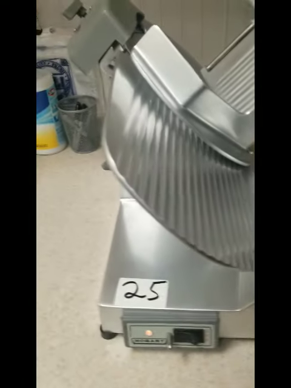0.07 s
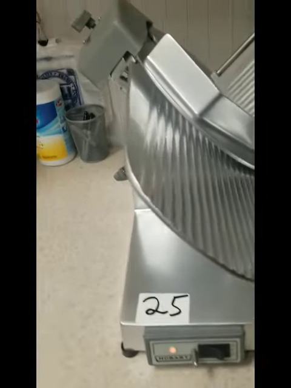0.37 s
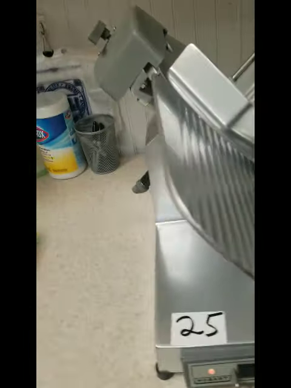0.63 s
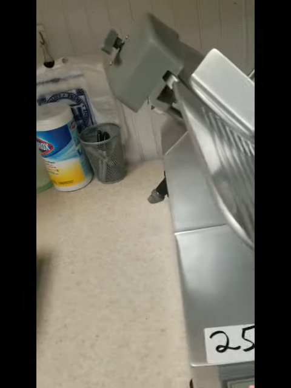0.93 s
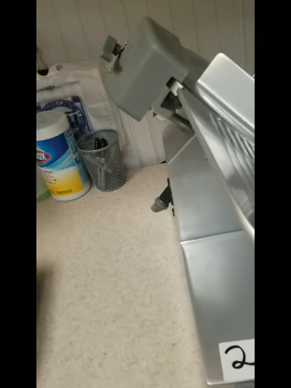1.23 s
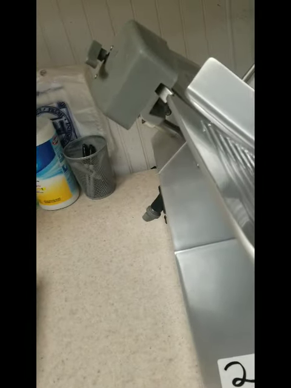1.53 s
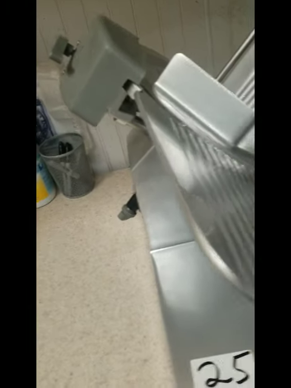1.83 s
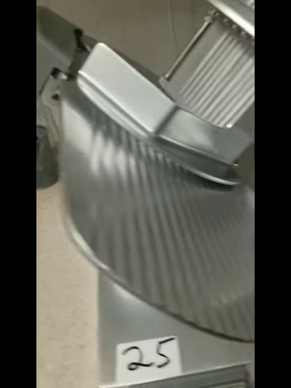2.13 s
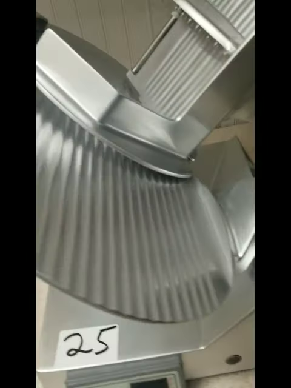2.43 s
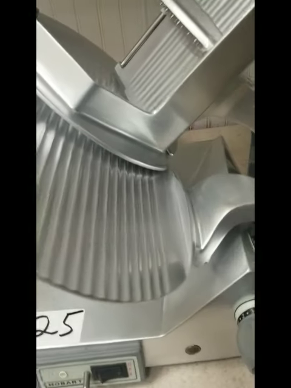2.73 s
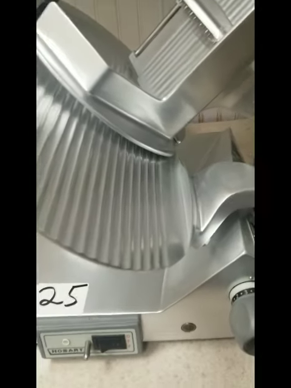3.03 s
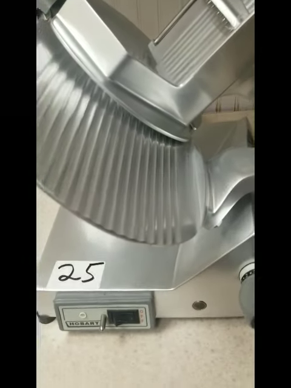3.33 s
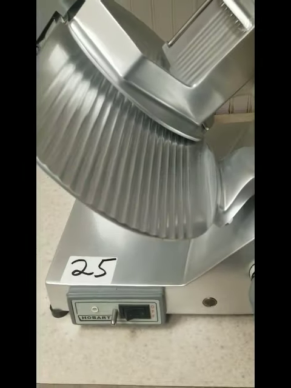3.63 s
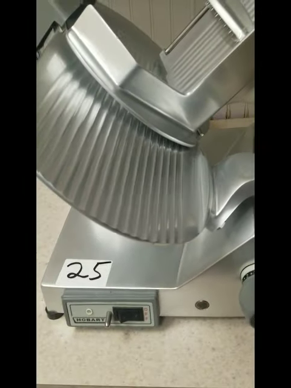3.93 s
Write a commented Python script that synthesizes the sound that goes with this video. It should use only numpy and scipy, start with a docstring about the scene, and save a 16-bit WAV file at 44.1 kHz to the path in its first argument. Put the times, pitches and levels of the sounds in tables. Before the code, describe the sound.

An electric deli slicer hums and chatters, then clicks off and its blade coasts.

```python
"""An electric deli slicer runs on a counter: on every turn of the blade the rim brushes its guard
and the drive teeth chatter against the housing, over the hum of the motor. The switch snaps off,
hum and chatter stop, and the blade coasts on, brushing ever more slowly, with a faint bearing
whistle and a few knocks from the slack drive. A refrigerator drones in the small room."""
import sys
import numpy as np
from scipy import signal
from scipy.fft import rfft, irfft
from scipy.io import wavfile

SR = 44100
rng = np.random.default_rng(int(sys.argv[2]) if len(sys.argv) > 2 else 0)


def bounce(signal):
    """Save signal as a 16-bit WAV file at the path given by the first command-line argument."""
    frames = np.transpose(np.atleast_2d(signal))
    limited = np.clip(frames, -1, 1)
    pcm = np.round(limited * 32767).astype(np.int16)
    wavfile.write(sys.argv[1], SR, pcm)


N = 176400
T, HZ = np.arange(N) / SR, np.fft.rfftfreq(N, 1 / SR)
HUM_HZ, OFF_S = 119.95, 2.0904  # pitch of the motor; the moment the power is cut
SINCE_OFF = np.maximum(T - OFF_S, 0)


def amp(db):
    """Decibels to gain."""
    return 10 ** (np.asarray(db) / 20)


def unit(x):
    """Scales to rms 1."""
    return x / np.sqrt(np.mean(abs(x) ** 2) + 1e-20)


def curve(points, at):
    """Joins breakpoints by straight lines."""
    return np.interp(at, *np.transpose(points))


def read(points, hz):
    """Reads breakpoints on a log-frequency axis."""
    freqs, values = np.transpose(points)
    return np.interp(np.log(hz + 1), np.log(freqs + 1), values)


def colour(x, points):
    """Shapes a sound with an EQ curve, at rms 1."""
    return unit(irfft(rfft(x) * amp(read(points, HZ)), N))


def resonate(x, modes):
    """Passes a sound through a bank of resonances, at rms 1."""
    power = sum(amp(db) ** 2 / (1 + (2 * (HZ - hz) / width) ** 2) ** 2 for hz, db, width in modes)
    return unit(irfft(rfft(x) * np.sqrt(power), N))


def noise():
    """White noise, unrelated in the two channels."""
    return rng.standard_normal((2, N))


def drift(rate_hz):
    """A complex random wander of rms 1, moving at up to about rate_hz."""
    white = rng.standard_normal(N) + 1j * rng.standard_normal(N)
    return unit(np.fft.ifft(white / (1 + (np.fft.fftfreq(N, 1 / SR) / rate_hz) ** 4)))


def tone(hz, db, waver, rate_hz):
    """A sine that wavers at random in level and phase."""
    phasor = np.exp(2j * np.pi * rng.random()) + waver * drift(rate_hz)
    return amp(db) * unit((phasor * np.exp(2j * np.pi * hz * T)).real)


def decay(start, t60):
    """Envelope of a hit: instant attack, then 60 dB down in t60 seconds."""
    return (T >= start) * np.exp(-np.log(1000) * np.maximum(T - start, 0) / t60)


def powered(hold_s, fall_db_per_s):
    """Envelope that stays full until hold_s after the power is cut, then dies away."""
    return amp(-fall_db_per_s * np.maximum(SINCE_OFF - hold_s, 0))


# Stereo width. Each row: frequency in Hz, left-right likeness from 0 (wide) to 1 (mono).
LIKENESS = [(100, 0.73), (250, 0.87), (500, 0.34), (900, 0.65), (1400, 0.059), (2500, 0), (6000, 0.0017),
            (15000, 0.043)]
# Pan of the slicer's motor, drive and bearings. Each row: frequency in Hz, left minus right in dB.
MACHINE_PAN = [(100, 1.4), (350, 2.7), (700, 0), (1300, -6.5), (2000, -7.5), (3500, -2), (6500, -5),
               (10000, 5), (15000, -3.5)]
def place(x, pan=MACHINE_PAN):
    """Pans a sound by frequency; a stereo sound is first narrowed in the lows."""
    left, right = rfft(x * np.ones((2, 1)))
    if x.ndim == 2:
        alike = np.clip(read(LIKENESS, HZ), 0, 1)
        right = alike * left + np.sqrt(1 - alike ** 2) * right
    lean = amp(read(pan, HZ) / 2)
    return irfft(np.array([left * lean, right / lean]), N)


# Refrigerator drone. Each row: pitch in Hz, level in dB, waver depth.
FRIDGE_TONES = [(59, -50.5, 0.95), (118.8, -40, 0.4), (181.8, -59.5, 0.99), (241.2, -48, 0.85),
                (489, -60.5, 0.35), (576, -82.5, 0.43), (697, -70.5, 0.47), (855, -63.5, 0.97)]
# Dark room tone. Each row: frequency in Hz, relative level in dB.
AIR_EQ = [(15, -47), (25, -11), (119, -5), (169, -9), (240, -4.5), (290, -11), (584, -17.5), (686, -13),
          (744, -31.5), (851, -27), (1240, -27.5), (6410, -43), (7960, -48), (11900, -41), (15600, -42)]
# Pan of the background. Each row: frequency in Hz, left minus right in dB.
ROOM_PAN = [(100, 1), (500, 0.057), (1500, 1), (15000, -1)]
def kitchen(air_db=-44):
    """The bed: a refrigerator drones over still room air."""
    drone = sum(tone(hz, db, waver, rate_hz=2.67) for hz, db, waver in FRIDGE_TONES)
    air = amp(air_db) * colour(noise(), AIR_EQ)
    return place(drone, ROOM_PAN) + place(air, ROOM_PAN)


# Tight reverb of the small room. Each row: frequency in Hz, seconds to fall 60 dB.
ROOM_DECAY = [(200, 0.34), (1500, 0.16), (5000, .17), (15000, 0.15)]
def room(x, wet_db):
    """Adds a short tail of sparse reflections from the counter and walls."""
    taps = rng.choice([-1., 1.], (2, SR // 2)) * (rng.random((2, SR // 2)) < .1)
    hz, t, bands = signal.stft(taps, SR, nperseg=256)
    tail = signal.istft(bands * amp(-60 * t / read(ROOM_DECAY, hz)[:, None]), SR)[1]
    wet = signal.fftconvolve(x * np.ones((2, 1)), tail / np.linalg.norm(tail[0]), axes=1)[:, :N]
    return x + amp(wet_db) * wet


def bearing_whistle(start_hz=3720, sag_hz_per_s2=190, width_hz=150, db=-58.5, fade_from_s=2.44):
    """A bearing sings as the blade slows: a thin, fuzzy whistle that sags and dies out."""
    pitch = start_hz - sag_hz_per_s2 * SINCE_OFF ** 2
    carrier = np.exp(2j * np.pi * np.cumsum(pitch) / SR)
    whistle = unit(np.array([(drift(width_hz) * carrier).real for channel in range(2)]))
    fade_in = np.minimum(SINCE_OFF / 0.032, 1)
    level = amp(db - 17 * np.maximum(T - fade_from_s, 0))
    return place(whistle * fade_in * level)


# Roll of the bearings. Each row: frequency in Hz, relative level in dB.
ROLL_EQ = [(25, -16), (55, 4), (130, 3), (245, 0), (330, 5.5), (600, -1), (750, 3), (900, 8.5),
           (1100, -0.5), (1450, -1.5), (2000, -2), (3100, -13.5), (4500, -14), (6500, -16), (8000, -36),
           (15000, -34)]
# Light knocks of the slack drive. Each row: start in seconds, level in dB.
DRIVE_KNOCKS = [(2.303, -43), (2.5, -41), (2.948, -43)]
def bearings_and_knocks(slowed, roll_db=-46, slowing_loss_db=15.5, attack_s=.005):
    """The bearings roll more softly as speed drops; the slack drive knocks while coasting."""
    roll = colour(noise(), ROLL_EQ) * amp(roll_db - slowing_loss_db * slowed)
    knock_body = resonate(noise(), [(1930, 0, 220), (2600, -10, 400), (4000, -17, 2000)])
    hits = sum(amp(db) * decay(start, t60=0.083) * np.clip((T - start) / attack_s, 0, 1)
               for start, db in DRIVE_KNOCKS)
    return place(roll + knock_body * hits)


# Release, then snap. Each row: start in seconds, crack level in dB, treble tilt in dB per octave,
# ring gain in dB.
SWITCH_HITS = [(2.0833, -22.5, 10, -46), (2.0871, -20.5, 2, -29)]
# The crack before its tilt. Each row: frequency in Hz, relative level in dB.
CRACK_EQ = [(300, -5), (1500, -1), (3000, 6.5), (4200, 8), (6000, 1), (7500, -20), (10500, -4),
            (12000, -13), (15000, -5)]
# Ring of the switch box. Each row: pitch in Hz, relative level in dB, seconds to fall 60 dB.
BOX_MODES = [(1664, 1, 0.042), (1880, -5.5, 0.031), (3300, -25, 0.056), (4100, -19, 0.049),
             (4660, 8.5, 0.0065), (5640, -18, 0.011), (6530, -12, 0.023)]
# Pan of the switch, mostly right. Each row: frequency in Hz, left minus right in dB.
SWITCH_PAN = [(300, -12), (1500, -16), (3500, 0.5), (6500, -5), (14000, -5)]
def switch():
    """Two quick cracks: a bright release, then the snap that rings the switch box."""
    clicks = np.zeros((2, N))
    for start, crack_db, tilt, ring_db in SWITCH_HITS:
        tilted_eq = [(hz, db + tilt * np.log2(hz)) for hz, db in CRACK_EQ]
        crack = colour(noise(), tilted_eq) * decay(start, t60=0.017)
        box = sum(amp(db) * decay(start, t60) * np.sin(2 * np.pi * hz * (T - start))
                  for hz, db, t60 in BOX_MODES)
        clicks += amp(crack_db) * crack + amp(ring_db) * box
    return place(room(clicks, wet_db=-3.5), SWITCH_PAN)


# Motor hum. Each row: harmonic number, level in dB, waver depth, depth of the sway on each turn.
HUM_HARMONICS = [(1, -21, 0.045, 0.024), (2, -35.5, 0.73, 0.11), (3, -38.5, 0.74, 0.17),
                 (4, -54.5, 0.54, 0.24), (5, -54.5, 0.42, 0.38), (7, -56, 0.36, 1), (10, -62, 0.35, 0.88)]
# Whine of the drive. Each row: pitch in Hz, level in dB.
WHINE_TONES = [(626, -55), (689, -56.5), (804, -56.5), (864, -52.5), (953, -62), (1132, -55), (1250, -60.5),
               (1372, -52.5)]
# Running noise of the motor. Each row: frequency in Hz, relative level in dB.
WHIRR_EQ = [(40, -22), (100, 9), (200, 2.5), (290, -25), (360, 6), (450, -12), (650, -8.5), (760, -3),
            (900, -10), (1400, -12.5), (2500, -20.5), (3600, -20), (4800, -29), (5700, -23.5),
            (8000, -35.5)]
def motor(turns, whirr_db=-39.5):
    """Magnetic hum swayed by the load of each turn, with whine and whirr, until the power is cut."""
    load = np.cos(2 * np.pi * (turns - .55))
    hum = np.zeros(N)
    for k, db, waver, sway in HUM_HARMONICS:
        harmonic = tone(k * HUM_HZ, db, waver, rate_hz=17.4) * unit(1 + sway * load)
        hum += harmonic * powered(hold_s=0.034 / k ** 2, fall_db_per_s=172.5)
    whine = sum(tone(hz, db, waver=0.89, rate_hz=4.8) for hz, db in WHINE_TONES)
    whirr = amp(whirr_db) * colour(noise(), WHIRR_EQ)
    return place(hum) + (place(whine) + place(whirr)) * powered(hold_s=0.012, fall_db_per_s=130)


# Resonances of the housing. Each row: frequency in Hz, relative level in dB, width in Hz.
HOUSING_MODES = [(650, -7, 100), (950, -2.5, 140), (1200, 0, 150), (1380, 3, 240), (1686, -0.5, 150),
                 (1826, 1.5, 120), (2137, -2.5, 160), (2425, -6.5, 170), (2790, -3, 39), (2965, -7.5, 83),
                 (3270, -10, 93), (3600, -19, 400), (4420, -13, 164), (4850, -17, 220)]
# Broad fill between the resonances. Each row: frequency in Hz, relative level in dB.
FILL_EQ = [(250, -31), (600, -10), (800, -5), (1300, -1), (2200, -8.5), (3800, -16.5), (6000, -20),
           (9000, -40), (15000, -55)]
# Swell of the chatter on each turn. Each row: position in the turn from 0 to 1, gain in dB.
CHATTER_SWELL = [(0, -27), (.12, -12.5), (.26, -2), (.4, 1.5), (.7, 0), (.85, -20), (1, -17)]
# Fader ride under that swell. Each row: time in seconds, level in dB.
CHATTER_RIDE = [(0, -36.5), (.55, -37), (1.0, -34), (1.45, -33), (2.0, -34)]
def chatter(turns, tooth_hz=236.5, jitter=.07, grit=0.58, throb=0.52, fill_db=-11):
    """Drive teeth tap the housing, shaken by the hum, through half of every turn."""
    teeth = tooth_hz * T + jitter * drift(60).real + .25 * drift(5.5).real
    taps = np.diff(np.floor(teeth), prepend=0) * rng.uniform(.5, 1, N)
    rasp = noise() * np.exp(-(teeth % 1) / 0.44)  # a puff of noise on each tooth
    shake = 1 + throb * np.cos(2 * np.pi * HUM_HZ * T)
    drive = (unit(taps) + grit * unit(rasp)) * shake
    smear = np.exp(1j * np.angle(rfft(noise() * decay(0, t60=0.053))))  # all-pass: blurs each tap
    drive = irfft(rfft(drive) * smear, N)
    body = resonate(drive, HOUSING_MODES) + amp(fill_db) * colour(drive, FILL_EQ)
    level = amp(curve(CHATTER_SWELL, turns % 1) + curve(CHATTER_RIDE, T))
    return place(unit(body) * level * powered(hold_s=0.002, fall_db_per_s=360))


# Shape of one brush stroke. Each row: offset from the contact in turns, gain in dB.
BRUSH_STROKE = [(-.5, -17.5), (-.22, -8.5), (-.17, -10), (-.06, -3), (-.035, 0.5), (.05, -1), (.2, -8.5),
                (.36, -13), (.5, -19)]
# Hiss of the rim on the guard. Each row: frequency in Hz, relative level in dB.
BRUSH_EQ = [(1180, -34), (2000, -2), (2660, 0), (2970, -8), (4080, -9), (4410, -1), (4760, -13.5),
            (6170, -9), (6780, -4), (7780, -10), (7980, -56), (8190, -22.5), (9810, -11), (12900, -1),
            (15600, 0.5)]
# Metallic shimmer of the blade. Each row: frequency in Hz, relative level in dB, width in Hz.
BLADE_MODES = [(2424, 0, 76), (2600, -1, 210), (3180, -2.5, 330), (3986, -1, 250), (4810, -2.5, 320),
               (5620, 0.5, 140), (5835, 0.5, 96), (6640, 0, 70), (7470, -3, 61), (8470, -5.5, 114),
               (9310, -8.5, 140), (10090, -4, 190), (10820, 0.5, 100), (11700, -0.5, 240), (12450, 2, 130),
               (12600, 1, 97), (12980, 3, 250), (13850, -17, 130), (14520, 5.5, 140), (15050, 0, 230)]
# Pan of the blade, a little right. Each row: frequency in Hz, left minus right in dB.
BLADE_PAN = [(1000, -2), (2500, -0.5), (4000, -2.5), (6500, -2.5), (10000, -1), (15000, -4)]
def blade_brushing(turns, slowed, hiss_db=-44.5, ring_db=-42.5, grain_db=0.5, flutter_db=-0.6):
    """The rim rubs the guard once a turn: a gritty, uneven hiss that rings the blade."""
    from_contact = (turns + .5) % 1 - .5
    contact = amp(curve(BRUSH_STROKE, from_contact) + flutter_db * drift(75).real)
    grains = noise() * amp(grain_db * rng.standard_normal(N))
    # As the blade slows, its ring fades faster than the hiss.
    hiss = colour(grains, BRUSH_EQ) * amp(hiss_db - 11 * slowed ** 2)
    shimmer = resonate(noise(), BLADE_MODES) * amp(ring_db - 22 * slowed ** 2)
    return place((hiss + shimmer) * contact, BLADE_PAN)


def scene(turns_per_s=6.255, first_brush_s=.125, brake_turns_per_s2=3.0, ease_turns_per_s3=.32):
    """The blade turns steadily until the power is cut; then friction slows it, gradually easing off."""
    speed = turns_per_s - brake_turns_per_s2 * SINCE_OFF + ease_turns_per_s3 * SINCE_OFF ** 2
    turns = np.cumsum(speed) / SR - turns_per_s * first_brush_s  # whole numbers: rim meets guard
    slowed = 1 - speed / turns_per_s  # 0 at full speed, 1 at standstill
    slicer = motor(turns) + chatter(turns) + blade_brushing(turns, slowed)
    return slicer + bearings_and_knocks(slowed) + bearing_whistle() + switch() + kitchen()


def record(dry, cutoff_hz=15600):
    """A steep low-pass trims the very top of the mix."""
    lowpass = signal.firwin(511, cutoff_hz, window=("kaiser", 9), fs=SR)
    return signal.oaconvolve(dry, lowpass[None], "same")


dry = scene()
out = record(dry)
bounce(out)
```